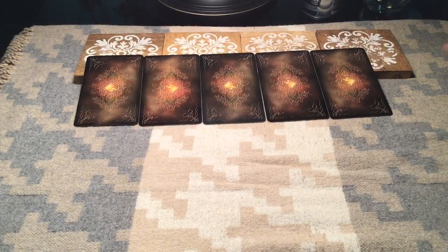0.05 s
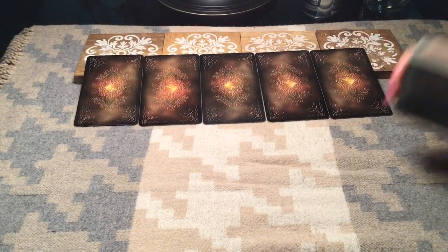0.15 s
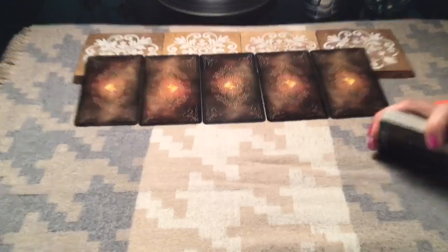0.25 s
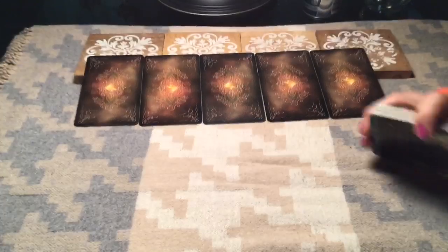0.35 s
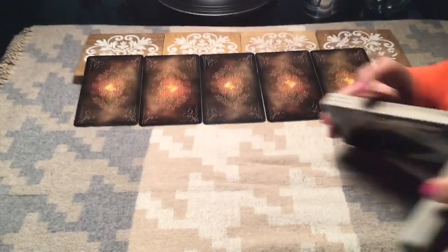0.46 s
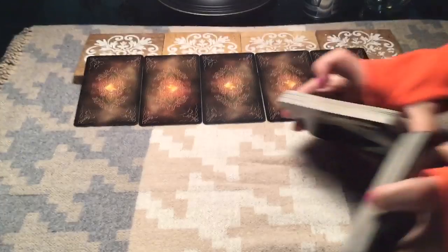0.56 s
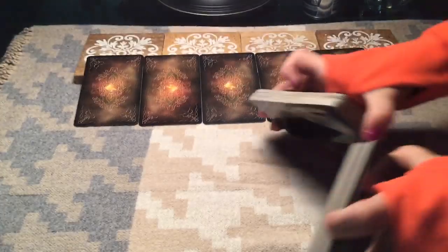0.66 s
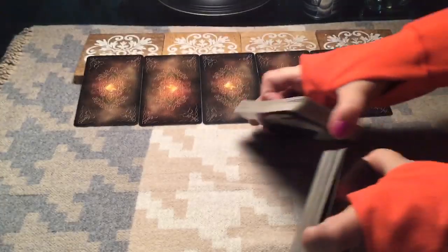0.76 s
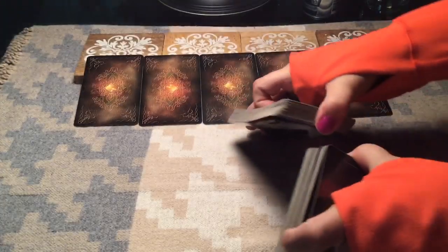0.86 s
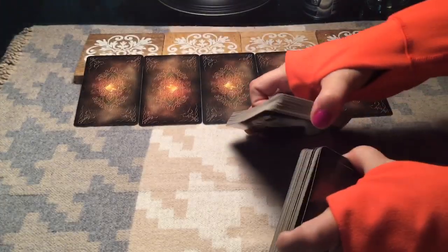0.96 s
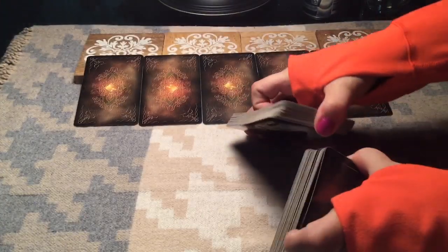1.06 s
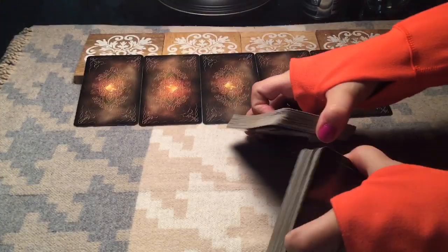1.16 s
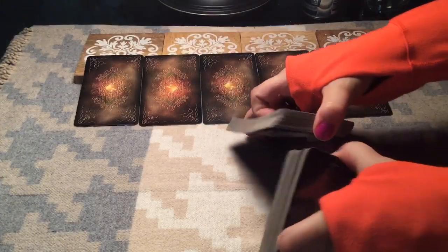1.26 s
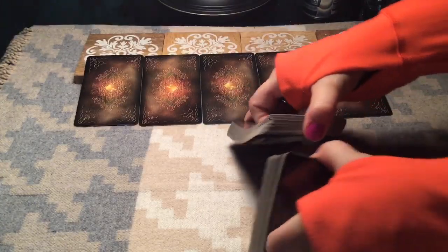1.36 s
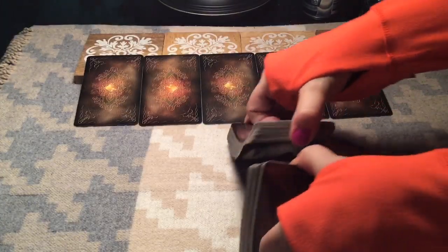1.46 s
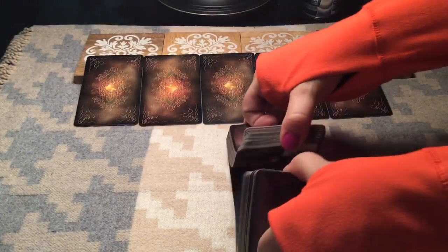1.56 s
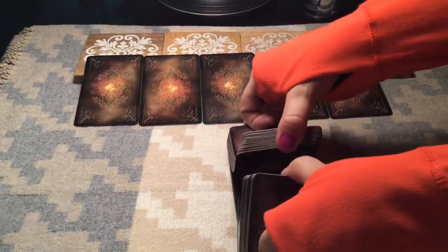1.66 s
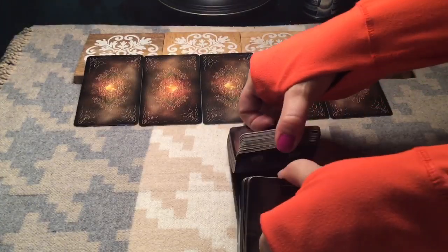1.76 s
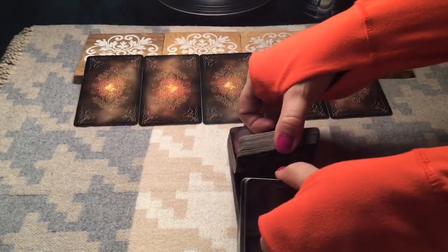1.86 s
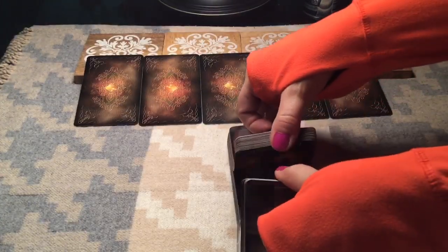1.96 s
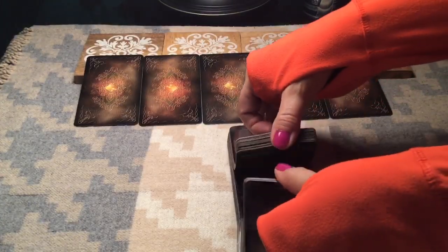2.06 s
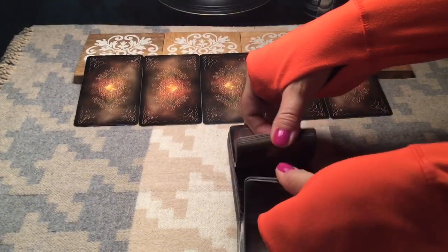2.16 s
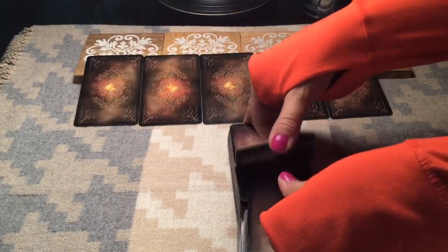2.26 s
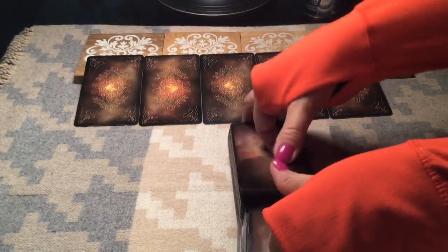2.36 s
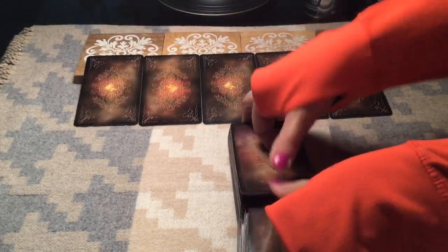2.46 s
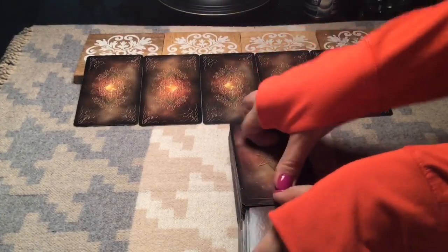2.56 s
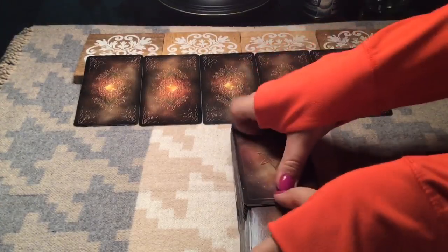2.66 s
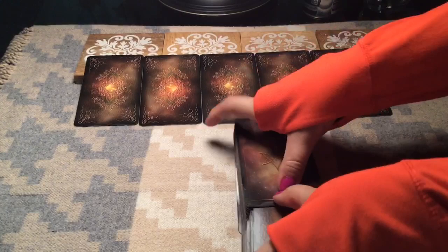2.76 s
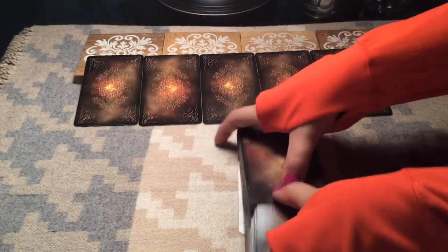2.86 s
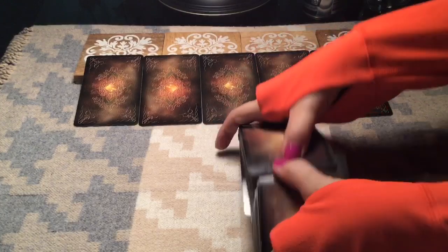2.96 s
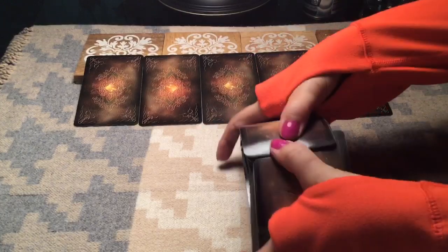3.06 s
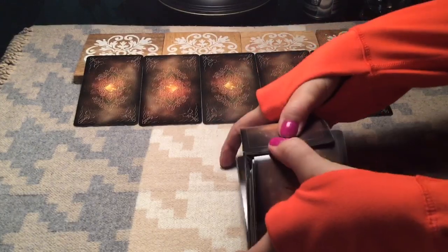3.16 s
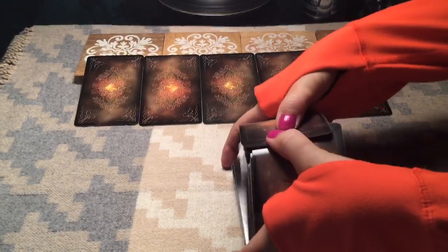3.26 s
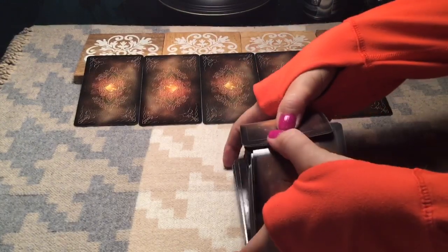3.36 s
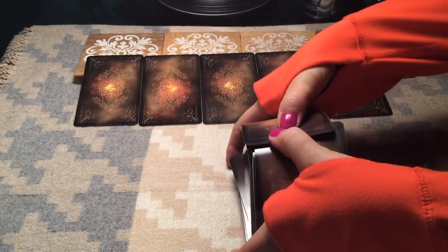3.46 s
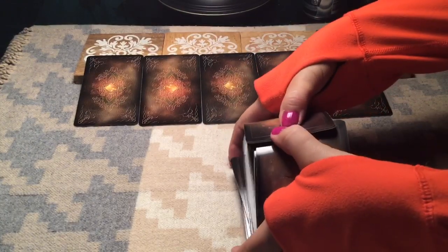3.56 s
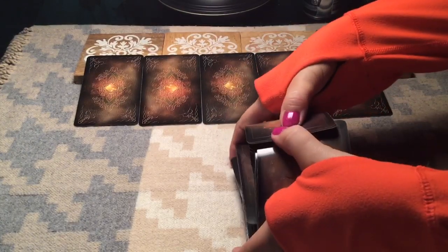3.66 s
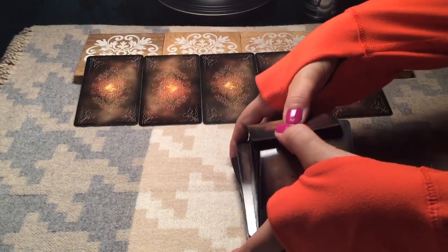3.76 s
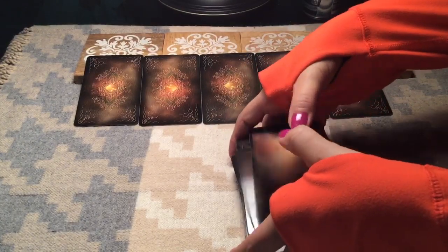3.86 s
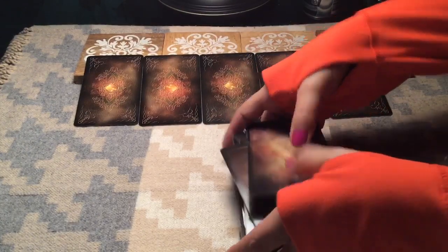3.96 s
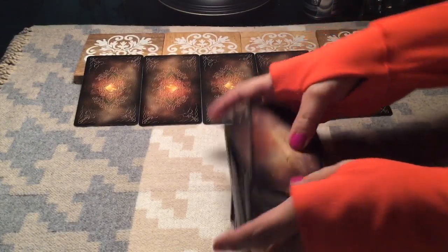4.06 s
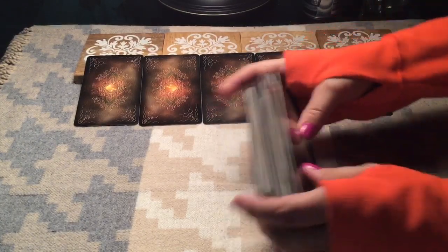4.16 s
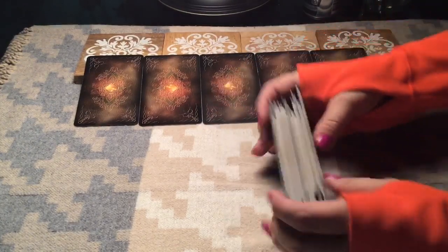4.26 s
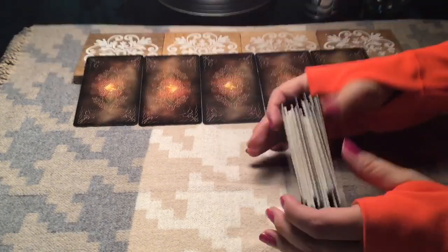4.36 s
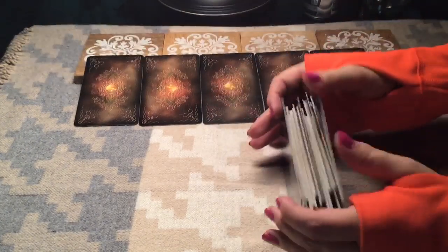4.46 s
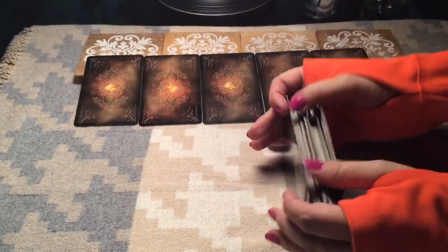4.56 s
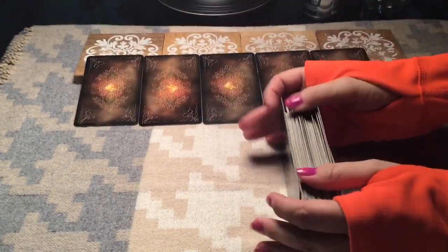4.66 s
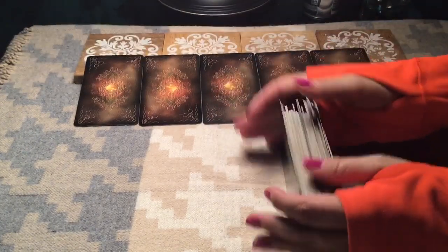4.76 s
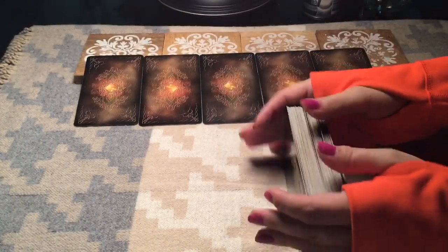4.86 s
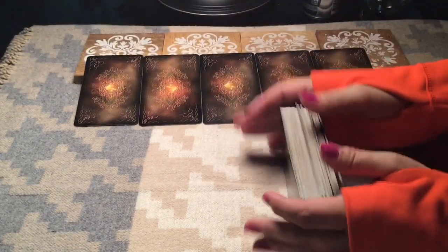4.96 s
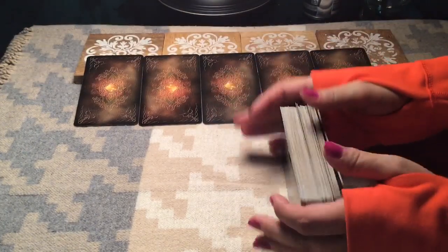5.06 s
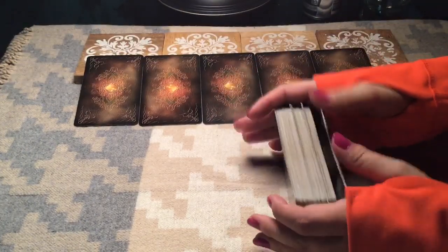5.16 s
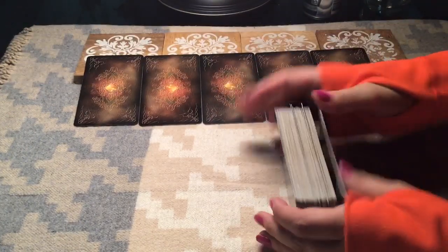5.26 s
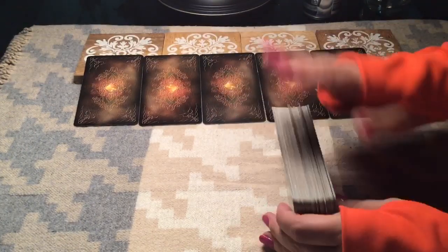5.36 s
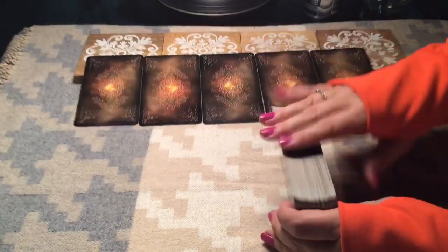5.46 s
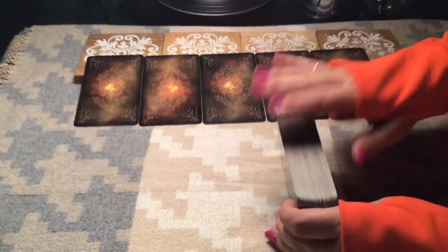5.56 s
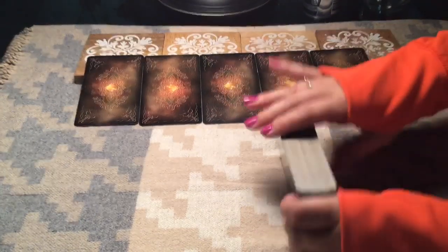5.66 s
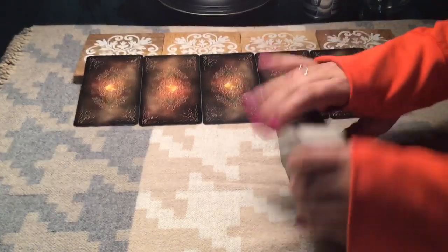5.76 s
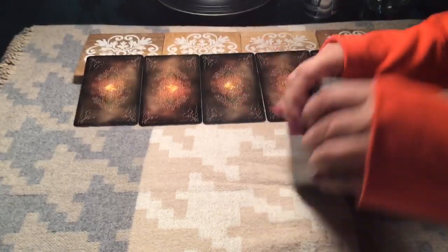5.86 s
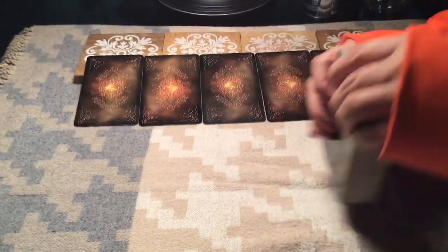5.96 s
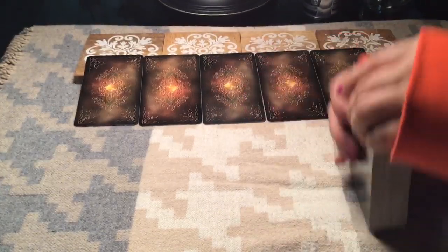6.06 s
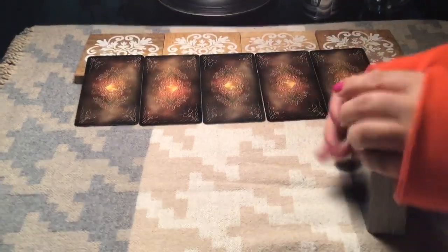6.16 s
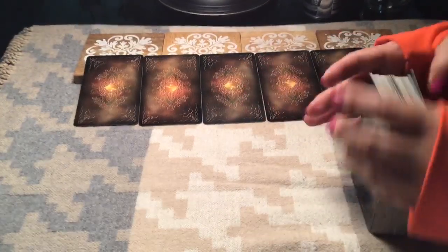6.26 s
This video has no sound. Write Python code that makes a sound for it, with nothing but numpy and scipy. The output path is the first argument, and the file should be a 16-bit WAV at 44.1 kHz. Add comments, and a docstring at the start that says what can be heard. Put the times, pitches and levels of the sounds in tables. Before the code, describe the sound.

Quiet small room, dry and intimate. A hard knock of cards on a padded table comes first, with a faint buzz of glass behind it. Then about a second of little but hum, followed by a dense flutter of stiff cards, bright snaps over woody rumble. Short papery scrapes and rattles follow as the cards interleave, ending with double-bump taps, light ticks and soft hand rustles.

```python
"""Card shuffle on a cloth-covered wooden table in a quiet room, close to a microphone on the table.
The deck is knocked down, riffled card by card (noise bursts through flap resonances), pushed together in
strokes (coloured friction noise) and squared with taps. Blows and falling cards set table modes booming;
a glass buzzes after each hard blow. Under it all: a diffuse room tail, room tone, hum and a low drone."""
import sys
import numpy as np
from scipy import signal
from scipy.fft import rfft, irfft, next_fast_len
from scipy.io import wavfile

SR = 44100
rng = np.random.default_rng(int(sys.argv[2]) if len(sys.argv) > 2 else 0)


def transcribe(signal):
    """Save signal, clipped to [-1, 1], as a 16-bit WAV file at the path in sys.argv[1]."""
    frames = np.atleast_2d(signal).T
    limited = np.clip(frames, -1, 1)
    pcm = np.round(limited * 32767).astype(np.int16)
    wavfile.write(sys.argv[1], SR, pcm)


N = 278976

# card edges let go: (time [s], flap peak [dB], flap pitch [Hz], treble [dB], knock force on pile [dB],
# broad crack over flap [dB], t60 of burst shape [flap cycles], flap t60 [flap cycles], rustle after it [dB])
SNAP_EVENTS = [(.305,-59.5,3540,-75,-52,2,33,9.8,12),(0.327,-38.5,3960,-33,-49,-5,88,5.3,-9),(.34,-65,3510,-67,-57,-10,52,11,6),(.354,-73,1500,-80,-46,-2,40,11,-8),(0.367,-56.5,3260,-47,-50,1,100,15,-9),
               (0.7917,-64,4360,-68,-62,4.5,110,13,0),(1.1654,-60,3260,-84,-72,-6,70,11,-3),(1.1732,-54.5,3020,-81,-73,-12,46,7.5,3),(1.6166,-36,3970,-54,-49,1,50,7.1,7),
               (1.6204,-27.5,2420,-40,-40.5,-3,60,2.5,2),(1.6345,-32,1280,-32.5,-30,-4,29,6.1,2.5),(1.657,-49,3200,-50,-69,-3.5,60,11,1.5),(1.669,-44,7100,-56,-65.5,-12,90,11,6),
               (1.6842,-31,1310,-38.5,-35.5,-4,39,6.3,0.5),(1.6993,-43,4500,-44.5,-47,-5,52,11,7.5),(1.7124,-29,1970,-46,-27.5,6,43,15,-1.5),(1.728,-46,1570,-45,-60,1,52,11,10),
               (1.7456,-33,2830,-41.5,-32,-7.5,43,16,-6.5),(1.748,-19.5,2880,-30.5,-17.5,0,73,11,-1.5),(1.762,-41,3200,-57.5,-33,3,58,10,-2),(1.8131,-26.5,2500,-61,-27,-9,75,4.8,-0.5),
               (1.8288,-35,1340,-45,-38,-8,27,10,4),(1.8398,-24.5,2900,-32.5,-35,-6.5,100,13,0.5),(1.8436,-47,2280,-53.5,-21,-12.5,52,11,1),(1.8539,-23.5,2700,-38,-34,-5.5,52,8.8,-4.5),
               (1.8596,-26.5,1250,-65,-47.5,-13.5,49,5.1,-1),(1.871,-41,2820,-41,-60,-7,52,12,4.5),(1.9159,-33,1870,-40,-29.5,-2.5,52,14,3.5),(1.924,-23.5,2400,-37,-30,-6.5,57,6.8,1.5),
               (1.9303,-29,1500,-41.5,-35,2.5,46,11,11.5),(1.9468,-50,4910,-40.5,-57,7,52,11,4.5),(1.979,-25.5,1910,-37.5,-28.5,-5,53,11,3),(1.984,-43,4600,-42,-48.5,0,60,11,2),(1.998,-31,2100,-34,-39.5,3.5,64,12,4),
               (2.0106,-24.5,2870,-37,-35.5,-8.5,61,11,9),(2.027,-25,2490,-32,-55,0,45,7.6,-1.5),(2.0282,-17,2650,-33,-41.5,-10.5,51,19,7.5),(2.0331,-8.5,3900,-31,-28.5,-10.5,67,12,9),
               (2.0347,-24,1330,-39.5,-47.5,-9,32,28,-3),(2.0491,-33,4594,-41.5,-41,2.5,34,11,-5),(2.0541,-19,6060,-25,-34.5,-2.5,44,17,5.5),(2.0562,-25,3240,-38.5,-26,-8,84,10,-0.5),
               (2.0703,-32,3680,-35.5,-57,-9.5,72,14,1.5),(2.093,-32.5,5130,-39.5,-41,3,140,11,11),(2.121,-27,1910,-40.5,-33.5,-2,51,13,4.5),(2.144,-38,5500,-40,-56,4.5,57,11,2.5),
               (2.154,-22,2590,-19.5,-24.5,-1,42,21,-2.5),(2.1855,-31,1420,-36,-36,3,28,8.8,10),(2.19,-20,2750,-38.5,-28,-4,145,5.8,0),
               (2.191,-42,4800,-33.5,-38,-2,64,12,2),(2.1966,-25,3030,-27.5,-60,-10,110,14,6),(2.204,-16,3300,-15,-23.5,-9,68,24,-3.5),(2.243,-50,3260,-56,-61,-5,94,9.7,-1),(2.269,-41,6200,-45,-59.5,-3,80,11,11),
               (2.274,-21.5,2610,-30.5,-27.5,3.5,87,13,2),(2.288,-24,3300,-26,-24,-3,90,13,1),(2.3003,-22.5,1710,-24,-30,4,40,9,2.5),(2.3117,-33,5000,-47.5,-48,-7.5,52,11,2),
               (2.3188,-24,1600,-30.5,-28.5,6,48,6.3,5.5),(2.342,-28,6500,-23.5,-35,-8,100,14,-3),(2.35,-21.5,2800,-10.5,-33.5,5,68,5.7,-10.5),(2.4408,-48,4270,-54,-50,3,40,11,0.5),
               (2.445,-18,3300,-26,-26.5,-6.5,112,6.2,-5.5),(2.466,-36,5840,-34,-73,-3,160,9.8,1.5),(2.4755,-39,4500,-40,-41,4,88,11,5.5),(2.587,-64,2900,-76,-60,-14.5,42,11,-6),
               (2.711,-81,1506,-79.5,-58.5,16,41,9,6),(2.773,-61,3440,-55,-61,-4,68,13,-4.5),(2.8224,-54,3560,-54,-54.5,-7,75,8.5,3.5),(3.3229,-38,1834,-71.5,-43.5,1,28,7.7,-1.5),
               (3.354,-46.5,1950,-61,-41,5.5,83,13,7),(3.4957,-50,1940,-58,-63,-6,82,15,1),(3.5085,-37.5,1460,-61,-42.5,-5.5,67,15,3),(3.533,-45,2350,-64,-74.5,-5.5,44,11,0),
               (3.5454,-41,2310,-58,-61.5,-5,83,11,0.5),(3.591,-47,1400,-64,-54.5,-7,32,11,2.5),(3.5553,-50,3000,-49,-44,2.5,52,11,4),(3.6095,-35,1890,-54,-41,-6.5,110,14,2.5),(3.6158,-42,1720,-64,-47,-4.5,59,8.9,4.5),
               (3.622,-42,1700,-61,-39,-3,31,8.8,4.5),(3.6386,-39,2640,-60,-43.5,-7,58,9.5,0.5),(3.6455,-29,2370,-53,-44,1.5,61,13,9.5),(3.6557,-38,3000,-44,-46.5,-16.5,46,9.6,0),
               (3.673,-37,2840,-65,-49,-14.5,52,13,6.5),(3.676,-39,1770,-62.5,-54,-7.5,53,6.5,0),(3.693,-44.5,4180,-56.5,-47.5,2,80,11,10.5),(3.7023,-44.5,1860,-63,-53,-15,52,12,0),
               (3.709,-46,1490,-64,-68,-13,40,14,2),(3.8568,-24,2830,-38,-67.5,-10.5,60,29,-1),(3.858,-34.5,2520,-56,-58,-9.5,60,16,-5),(3.8842,-48,1490,-66,-49,-8,42,10,9.5),(3.9025,-43,2240,-61,-45.5,-5,52,9.2,-0.5),
               (3.909,-44,2370,-54,-47.5,2,36,9.6,2.5),(3.9119,-41,4380,-55.5,-47.5,-4,65,13,4.5),(3.9203,-49,4860,-55,-50,-5.5,52,11,11.5),(3.9278,-34,6260,-52.5,-56.5,-10.5,47,14,-2),
               (4.118,-58,4740,-61.5,-68,4.5,48,10.6,2),(4.37,-58.5,5890,-45,-61,-8,62,12.6,1.5),(4.4038,-57,2860,-70,-65.5,-3,64,11.4,-1),(4.579,-66.5,2664,-72,-75,2,56,11.7,0),
               (4.745,-60,2993,-75,-74,-5.5,80,8.3,0),(4.765,-67.5,3293,-82.5,-76,-3.5,80,7.9,0.5),(5.074,-61,2928,-67.5,-54.5,1,49,10,-2),(5.2527,-48,2670,-60.5,-68,-2,55,20,0),(5.508,-73,1506,-55,-55,2,52,12,2.5),
               (5.5497,-59.5,2970,-66.5,-66,-1.5,64,11.4,-3),(5.5585,-59.5,3107,-77.5,-69.5,-2,58,13.7,-0.5),(5.747,-63,3210,-75,-76,-9,52,10.2,1),(5.858,-71.5,1496,-78,-54,2,54,12.2,-0.5),
               (6.241,-54.5,3670,-63.5,-55,-6,54,10,1),(6.311,-59,3330,-82,-76.5,-13,57,13.5,-6)]
# hard blows with two follow-up knocks and glass buzz: (blow time [s], first knock [dB], second knock [dB],
# buzz of lowest mode [dB], buzz of upper modes [dB], buzz hold [s])
HARD_BLOWS = [(0.293, -25, -47.5, -79.5, -80.5, 0.25), (4.365, -33.5, -39, -82.5, -84.5, 0.15),
              (5.511, -39, -41, -81, -84, 0.12), (5.696, -36.5, -43, -78.5, -80.5, 0.1),
              (6.192, -30, -35, -78.5, -81, 0.083)]


def from_db(db):
    """Decibels to gain."""
    return 10 ** (np.asarray(db) / 20)


def rms_one(x):
    """Scale to rms 1."""
    return x / np.sqrt(np.mean(x ** 2) + 1e-20)


def bandpass(low_hz, high_hz):
    """First-order Butterworth band."""
    return signal.butter(1, [low_hz, high_hz], "band", fs=SR, output="sos")


def highpass(order, hz, x):
    """Butterworth low cut."""
    return signal.sosfilt(signal.butter(order, hz, "high", fs=SR, output="sos"), x)


def colour(x, spectrum):
    """Weight by (Hz, dB) points joined on a log frequency axis; rms 1."""
    size = next_fast_len(len(x))
    hz = np.maximum(np.arange(size // 2 + 1) * SR / size, 1)
    points = np.array(spectrum)
    weight_db = np.interp(np.log(hz), np.log(points[:, 0]), points[:, 1])
    return rms_one(irfft(rfft(x, size) * from_db(weight_db), size)[:len(x)])


def ring(clicks, hz, t60_s):
    """Two-pole resonator: a unit click starts a decaying sine of height 1."""
    r = from_db(-60 / (max(t60_s, .001) * SR))
    w = 2 * np.pi * hz / SR
    return signal.lfilter([0, np.sin(w)], [1, -2 * r * np.cos(w), r * r], clicks + 1e-18)


def drift(rate_hz):
    """Low-passed noise: random wander, rms 1."""
    r = np.exp(-2 * np.pi * rate_hz / SR)
    return rms_one(signal.lfilter([1], [1, -2 * r, r * r], rng.standard_normal(N + SR))[SR:])


def add(track, time_s, sound):
    """Mix a short sound in at a time."""
    i = round(time_s * SR)
    track[i:i + len(sound)] += sound[:N - i]


def push(contact_s):
    """Soft contact: bell-shaped force of area 1."""
    bell = np.hanning(max(round(contact_s * SR), 3) + 2)
    return bell / bell.sum()


def gains(rows, column):
    """Gain over time from a dB column; -200 dB outside the table."""
    rows = np.array(rows)
    return from_db(np.interp(np.arange(N) / SR, rows[:, 0], rows[:, column], left=-200, right=-200))


def snaps(rows):
    """Each card cracks: dry tick, dying noise burst, flap resonance and overtone; then it hits pile and table."""
    # broad part of a crack: (frequency [Hz], relative density [dB])
    card_spectrum = [(410, -23), (700, -13), (770, -14.5), (1330, -4.5), (2050, -34), (2580, -4),
                     (3830, -4.5), (4150, -5), (4690, -2), (16600, -34), (18000, -39.5)]
    # modes of the pile: (frequency [Hz], level [dB], t60 [s])
    pile_modes = [(600, -3, 0.026), (634, -9, 0.04), (404, -8.5, 0.027), (1270, -9, 0.022),
                  (180.1, -15.5, 0.065)]
    # push of a falling card in the riffle: (time [s], force on deep modes [dB], force on upper modes [dB])
    card_weight = [(1.6, -47, -47.5), (1.7, -31, -38), (1.76, -47.5, -39.5), (1.82, -37, -38),
                   (1.86, -33.5, -31.5), (1.93, -29, -35.5), (2.0, -39.5, -39), (2.05, -36, -32),
                   (2.11, -30, -27), (2.16, -24.5, -27.5), (2.2, -25.5, -32.5), (2.24, -35.5, -42),
                   (2.28, -31, -33.5), (2.31, -36, -34.5), (2.35, -34, -38.5), (2.46, -45, -41),
                   (2.55, -58, -68)]
    tick_db, tick_low_hz, tick_high_hz = -7.5, 1800, 8000  # level against the broad part
    overtone_db, overtone_cycles = -11, 25
    t = np.arange(2048) / SR
    noise = rng.standard_normal((len(rows), 2, len(t)))
    ratios = rng.uniform(1.3, 2.0, len(rows))  # overtone over flap pitch
    card = colour(rng.standard_normal(N), card_spectrum)
    treble_band = bandpass(6500, 11000)
    tick = signal.sosfilt(bandpass(tick_low_hz, tick_high_hz), 1.0 * (t == 0))
    crack, knocks, pushes = np.zeros(N), np.zeros(N), np.zeros((2, N))
    for row, draw, ratio in zip(rows, noise, ratios):
        time_s, peak_db, hz, treble_db, knock_db, broad_db, burst_cycles, flap_cycles, _ = row
        shape = from_db(-60 * t / (burst_cycles / hz)) * (1 - np.exp(-(t / 0.00062) ** 2))
        burst = shape ** 2 * draw[0]
        add(burst, .0012, np.array([3.0]))  # the edge slips off the thumb
        # two resonators in series: little outside the resonance
        flap = ring(ring(burst, hz, flap_cycles / hz), hz, 2.0 / hz)
        overtone = ring(burst, min(hz * ratio, 7600), overtone_cycles / (hz * ratio))
        i = min(round(time_s * SR), N - len(t))
        broad = shape ** 2.0 * card[i:i + len(t)]
        mix = flap / np.abs(flap).max()
        mix += from_db(broad_db) * broad / np.abs(broad).max()
        mix += from_db(overtone_db) * overtone / np.abs(overtone).max()
        treble_shape = shape ** 4.6 * (1 - np.exp(-t / 0.00027))
        treble = from_db(treble_db) * treble_shape * signal.sosfilt(treble_band, draw[1])
        add(crack, time_s - .0006, from_db(peak_db) * mix + treble)
        tick_gain = from_db(peak_db + broad_db + tick_db) * np.sign(draw[1, 0])  # random polarity
        add(crack, time_s + .0005, tick_gain * tick / tick.max())
        add(knocks, time_s + .001, from_db(knock_db) * push(.0005))

    weight_s, *weights_db = np.transpose(card_weight)
    for time_s, _, _, _, knock_db, *_ in rows:
        riffling = weight_s[0] < time_s < weight_s[-1]
        for track, weight_db in zip(pushes, weights_db):
            push_db = np.interp(time_s, weight_s, weight_db) if riffling else knock_db - 3.0
            add(track, time_s + 0.0024, from_db(push_db) * push(0.0012))
    pile = sum(from_db(level_db) * ring(knocks, hz, t60_s) for hz, level_db, t60_s in pile_modes)
    return crack + highpass(2, 120, pile), pushes  # the pile is too small to send out bass


def table(pushes):
    """Blows and card pushes drive the modes of the top; a mode sends out nothing far below its pitch."""
    # deck or hand on the table: (time [s], force [dB], then share over it of
    # sway [dB], boom [dB], body [dB], thud [dB], knock [dB])
    thumps = [(0.293, -29.5, -32, -16, -3, 8.5, -11), (0.303, -25.5, -30, 6.5, 2, -19, -25),
              (0.3213, -11.5, -9.5, -7, -3.5, -10.5, -17.5), (0.345, -32, 6, -2, -15, -19, -20),
              (0.352, -31.5, -23, 4, -25, -0.5, -7), (0.382, -36.5, 8, -36, -12, -2, -18),
              (0.432, -34, -5.5, -10, -9.5, -7, -14), (2.775, -39.5, -6, -5, -18, -0.5, -27),
              (2.963, -28, -38, -21, -18.5, -21, -18), (4.366, -29, -6.5, -10.5, -12.5, -1.5, -20.5),
              (5.51, -30, -5.5, -17, -13, -2, -18.5), (5.52, -33.5, -3.5, -3.5, -18, -5.5, -16),
              (5.537, -36, 1, -5.5, -6.5, -27.5, -15), (5.7005, -29.5, -12, -3.5, -3, -24.5, -20.5),
              (5.738, -37, 1.5, -12, -18, -9, -17), (5.856, -50, -25.5, -12, -15.5, -9.5, -20),
              (6.191, -30.5, -16.5, -0.5, -6, -15.5, -15.5), (6.2, -32.5, -2, -4.5, 5, -5, -17)]
    # sway, boom, body, thud, knock: (frequency [Hz], t60 [s], share of a card's push [dB])
    top_modes = [(69.5, 0.088, -32), (131.4, 0.17, -5.5), (157.8, 0.12, -6.5), (188, 0.078, -0.5),
                 (389, 0.037, -18)]
    # knocks after a hard blow: (delay [s], sway [dB], boom [dB], body [dB], thud [dB], knock [dB])
    rebounds = [(0.058, -9, -14.5, -8.5, -6, -4), (0.124, -39, -2.5, -8, -5, -2)]
    deep_under_hz, longest_contact_s = 145, 0.0056
    blows = list(thumps)
    for time_s, *knocks_db, _, _, _ in HARD_BLOWS:
        for knock_db, (delay_s, *share_db) in zip(knocks_db, rebounds):
            blows.append((time_s + delay_s, knock_db, *share_db))
    out = np.zeros(N)
    for k, (hz, t60_s, card_db) in enumerate(top_modes):
        force = pushes[int(hz > deep_under_hz)] * from_db(card_db)
        for time_s, force_db, *share_db in blows:
            add(force, time_s, from_db(force_db + share_db[k]) * push(min(longest_contact_s, 0.68 / hz)))
        out += highpass(3, hz, ring(force, hz, t60_s))
    return out


def rustle(rows, column, under_db, t60_s):
    """Power of the friction that starts as the edge slips and dies after the snap."""
    lead_s, rise_s = .006, .008
    kicks = np.zeros(N)
    for row in rows:
        power_gain = from_db(2 * (row[column] + row[-1] + under_db))
        add(kicks, row[0] - lead_s, power_gain * push(rise_s))
    return signal.lfilter([1], [1, -from_db(-120 / (t60_s * SR))], kicks)  # 60 dB of power per t60


def brushing(column):
    """Power of fingers and sleeves on cards and cloth: each brush swells and fades evenly."""
    # (middle [s], length [s], scrape [dB], hiss [dB])
    brush_events = [(0.336, 0.014, -58, -89), (0.45, 0.14, -95, -90), (0.577, 0.45, -81.5, -89.5),
                    (1.171, 0.023, -71.5, -92), (2.58, 0.35, -75.5, -86.5), (2.774, 0.022, -66.5, -73.5),
                    (4.374, 0.034, -70.5, -73), (4.55, 0.043, -78, -84.5), (4.618, 0.041, -76.5, -89),
                    (4.67, 0.22, -82.5, -88), (4.887, 0.049, -70.5, -72.5), (5.076, 0.025, -73, -78),
                    (5.513, 0.016, -75, -79), (5.596, 0.14, -88, -95), (5.81, 0.32, -82.5, -89.5),
                    (6.201, 0.04, -76.5, -84), (6.298, 0.17, -84.5, -94.5)]
    t = np.arange(N) / SR
    return sum(from_db(2 * row[column]) * np.exp(-(2 * (t - row[0]) / row[1]) ** 2 * 1.7)
               for row in brush_events)


def patchy(x, flickers):
    """Split into overlapping half-octave ranges from 700 Hz, each with its own flicker; rms 1."""
    size = next_fast_len(N)
    hz = np.arange(1, size // 2 + 2) * SR / size
    place = np.clip(2 * np.log2(hz / 700), 0, len(flickers) - 1)
    spectrum = rfft(x, size)
    out = 0
    for k, gain in enumerate(flickers):
        out = out + gain * irfft(spectrum * np.maximum(1 - np.abs(place - k), 0), size)[:N]
    return rms_one(out)


def slides(rows):
    """Friction of many faces: dense small slips of flickering strength, in scrape, hiss, rub and rasp ranges."""
    # spectra: (frequency [Hz], relative density [dB])
    scrape_spectrum = [(760, -24), (1300, -7), (1750, -1.5), (2300, -2.5), (2800, 1.5), (3300, -2),
                       (3900, -1), (4800, -2.5), (6200, -16.5), (8060, -37.5), (13600, -120)]
    hiss_spectrum = [(3410, -32.5), (5800, -6), (7350, -6.5), (10000, -11.5), (13000, -20), (16500, -22.5),
                     (17500, -21), (18000, -34)]
    rub_spectrum = [(150, -39), (250, 2.5), (295, 1), (686, 6.5), (782, -9), (1320, -2.5), (2000, -21.5),
                    (2600, -44), (4400, -120)]
    rasp_spectrum = [(2900, -39.5), (3900, -6), (4700, -3), (5500, -7.5), (7000, -12.5), (8400, -25)]  # edges catching on edges
    # halves pushed into each other: (time [s], scrape [dB], hiss [dB], rasp [dB])
    push_strokes = [(2.93, -90.5, -105, -99), (3.0, -77.5, -87, -95), (3.06, -79.5, -91, -86),
                    (3.1, -72, -78.5, -83), (3.16, -67.5, -76, -66.5), (3.2, -67, -74, -69.5),
                    (3.225, -64.5, -67.5, -65), (3.25, -68, -74, -63.5), (3.27, -76.5, -88, -80.5),
                    (3.31, -67.5, -73, -72.5), (3.34, -59.5, -62, -59.5), (3.375, -61, -61, -60.5),
                    (3.42, -68, -72.5, -79), (3.46, -64.5, -69, -68.5), (3.5, -62, -58.5, -59.5),
                    (3.53, -60, -64, -63.5), (3.575, -59.5, -58.5, -58.5), (3.61, -57, -63, -66),
                    (3.69, -55, -63.5, -68.5), (3.715, -61, -70, -73.5), (3.74, -73, -84, -84),
                    (3.81, -63.5, -73, -80), (3.85, -56, -59, -58), (3.88, -60.5, -66, -57),
                    (3.915, -49, -55, -62), (3.935, -65.5, -61, -73), (3.96, -77, -85, -85),
                    (4.05, -82.5, -92, -91), (4.3, -85, -87, -94)]
    # dull rub of the halves on the cloth: (time [s], level [dB])
    cloth_rub = [(2.93, -71.5), (3.1, -78), (3.23, -72), (3.28, -74), (3.33, -63), (3.365, -55),
                 (3.39, -68), (3.42, -74), (3.49, -78), (3.52, -69), (3.56, -62), (3.595, -78), (3.62, -60),
                 (3.69, -51.5), (3.72, -67), (3.82, -75), (3.87, -61), (3.89, -62), (3.925, -48),
                 (3.945, -67), (4.0, -77), (4.3, -89)]
    # cards settling after a snap, rows scrape, hiss, rub:
    # (level over the snap's peak, treble, knock respectively [dB], t60 [s])
    settling = [(-26.5, 0.093), (-24, 0.12), (-16, 0.18)]
    brush_rub_db = 4  # rub over scrape
    slip_spread_db, crackle_per_s, crackle_db = 2.5, 500, 12  # crackle: single edges that catch hard
    patch_db, patch_rate_hz = 1.8, 40
    pushing = [gains(push_strokes, column=k) ** 2 for k in (1, 2)]
    pushing.append(gains(cloth_rub, column=1) ** 2)
    brushes = [brushing(column=k) for k in (2, 3)]
    brushes.append(brushes[0] * from_db(2 * brush_rub_db))
    shared = drift(150)
    sizes = np.minimum(rng.exponential(1, N), 5)
    flickers = [from_db(patch_db * drift(patch_rate_hz)) for _ in range(9)]
    catches_db = crackle_db * (rng.random(N) < crackle_per_s / SR)
    out = 0
    for k, spectrum in enumerate([scrape_spectrum, hiss_spectrum, rub_spectrum]):
        strength_db = 1.6 * shared + 0.73 * drift(43) + slip_spread_db * sizes + catches_db
        slips = rng.standard_normal(N) * from_db(strength_db)
        snap_column = (1, 3, 4)[k]  # peak, treble, knock
        power = pushing[k] + brushes[k] + rustle(rows, snap_column, *settling[k])
        out = out + np.sqrt(power) * patchy(colour(slips, spectrum), flickers)
    rasp = patchy(colour(slips[::-1], rasp_spectrum), flickers)
    return out + gains(push_strokes, column=3) * rasp


def glass():
    """After each hard blow uneven small contacts (noise) keep the modes sounding a while; each mode flutters."""
    # (frequency [Hz], level over the buzz [dB], t60 [s], flutter [dB])
    glass_modes = [(645.6, 7, 0.21, 2.5), (1156, 1, 0.084, 1.5), (1220, -8, 0.03, 5.5)]
    rise_s, fall_db_per_s = 0.043, 133
    t, power = np.arange(N) / SR, 0
    for time_s, _, _, low_db, high_db, hold_s in HARD_BLOWS:
        fading_db = fall_db_per_s * np.maximum(t - time_s - rise_s - hold_s, 0)
        rise = np.clip((t - time_s) / rise_s, 0, 1)
        power = power + (rise * from_db(np.array([[low_db], [high_db]]) - fading_db)) ** 2
    out = 0
    for k, (hz, level_db, t60_s, flutter_db) in enumerate(glass_modes):
        gain = np.sqrt(power[min(k, 1)]) * from_db(level_db + flutter_db * drift(13))
        out = out + gain * rms_one(ring(rng.standard_normal(N), hz, t60_s))
    return out


def room(x):
    """Diffuse tail of unit energy: dying noise, duller than the source, after the first wall."""
    t60_s, wall_cut_hz = 0.36, 7200
    t = np.arange(SR // 2) / SR
    tail = rng.standard_normal(len(t)) * from_db(-60 * t / t60_s) * np.clip((t - .003) / 0.0024, 0, 1)
    tail = signal.sosfilt(bandpass(400, wall_cut_hz), tail)
    return signal.fftconvolve(x, tail / np.sqrt(np.sum(tail ** 2)))[:N]


def air():
    """Room tone and microphone hiss (coloured noise), unsteady hum bands, a drone and a mains sine."""
    # room tone and hiss: (frequency [Hz], relative density [dB])
    air_spectrum = [(15, -68), (25, -36), (48, -10), (86, -11), (138, -19), (203, -6.5), (332, -18.5),
                    (403, -16), (577, -35.5), (662, -27), (896, -33), (1350, -35), (3010, -37.5),
                    (13300, -47), (18000, -59)]
    # distant appliance, unsteady bands: (frequency [Hz], nominal width [Hz], level [dB])
    hum_bands = [(187, 270, -68), (637, 32, -81.5)]
    # narrow low tone that comes and goes: (time [s], level [dB])
    drone_level = [(0, -67.5), (.7, -79.5), (.8, -62), (1.1, -71.5), (1.25, -75), (1.36, -72), (1.6, -67),
                   (2.6, -71.5), (4, -80.5), (4.7, -70.5), (5.2, -78), (5.45, -67), (6.33, -79)]
    air_db, mains_hz, mains_db = -69, 59.6, -67
    drone_hz, drone_width_hz = 213, 17
    hum = sum(from_db(level_db) * rms_one(ring(rng.standard_normal(N), hz, 2.5 / width_hz))
              for hz, width_hz, level_db in hum_bands)
    drone = rms_one(ring(rng.standard_normal(N), drone_hz, 1.9 / drone_width_hz))
    drone = gains(drone_level, column=1) * drone
    mains = from_db(mains_db + .8 * drift(4.4)) * np.sin(2 * np.pi * mains_hz * np.arange(N) / SR)
    tone = from_db(air_db + 0.27 * drift(8)) * colour(rng.standard_normal(N), air_spectrum)
    return tone + hum + mains + drone


def scene():
    """Cards, table, glass, room tail and background."""
    room_db = -17.5
    cracks, pushes = snaps(SNAP_EVENTS)
    near = cracks + slides(SNAP_EVENTS) + table(pushes)
    return (near + glass() + from_db(room_db) * room(near) + air())[None]


def record(dry):
    """Cut the bass below 50 Hz and the top from 18.4 kHz."""
    low_cut = highpass(6, 50, dry)
    return signal.sosfilt(signal.cheby2(12, 70, 18400, fs=SR, output="sos"), low_cut)


dry = scene()
out = record(dry)
transcribe(out)
```